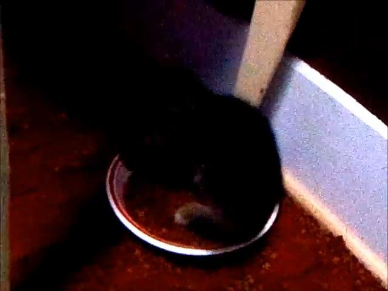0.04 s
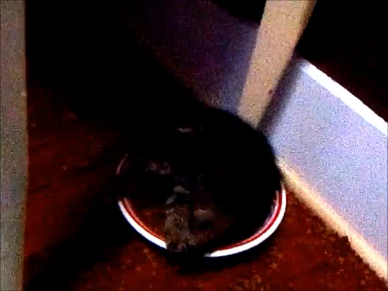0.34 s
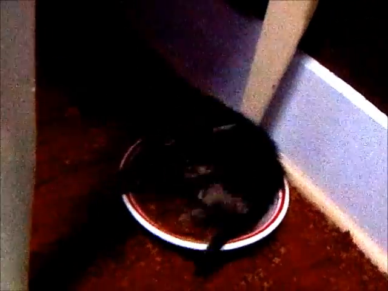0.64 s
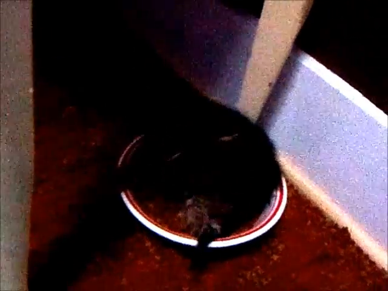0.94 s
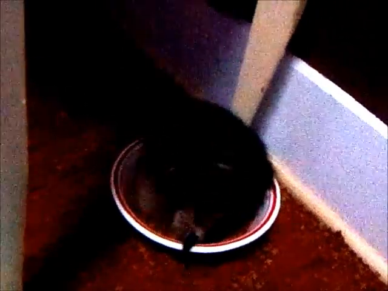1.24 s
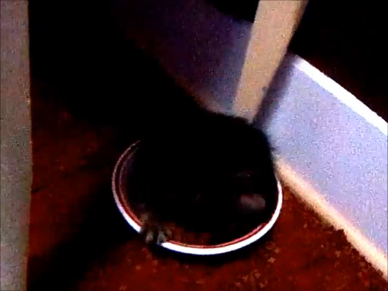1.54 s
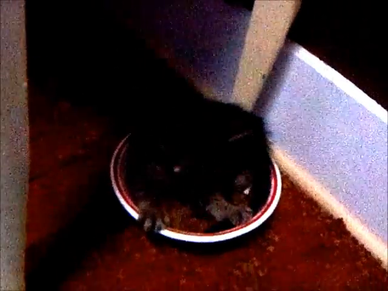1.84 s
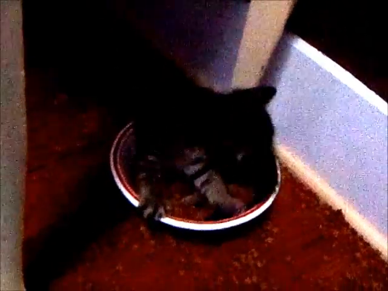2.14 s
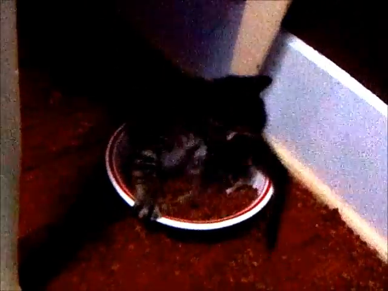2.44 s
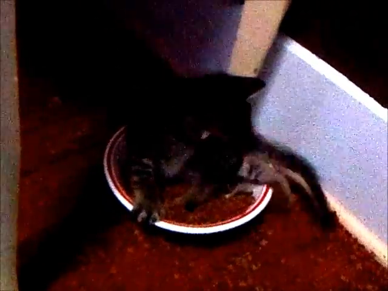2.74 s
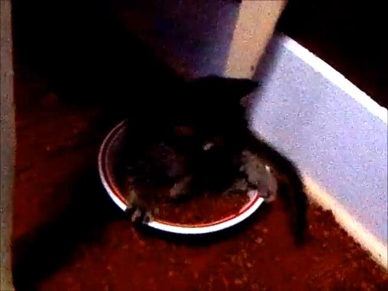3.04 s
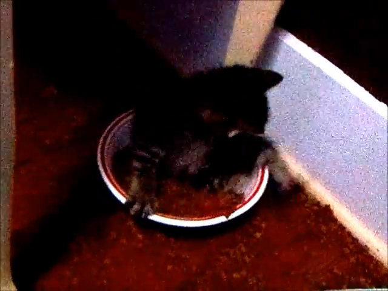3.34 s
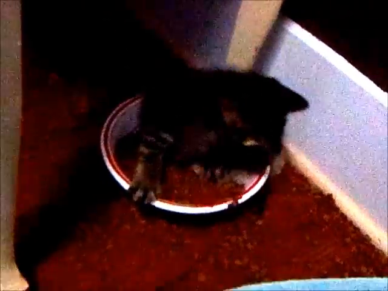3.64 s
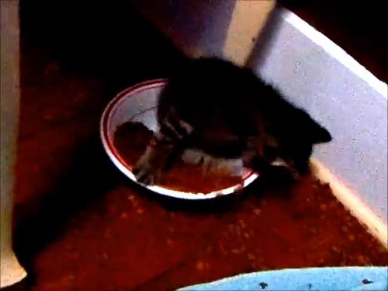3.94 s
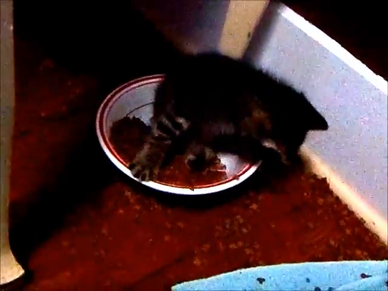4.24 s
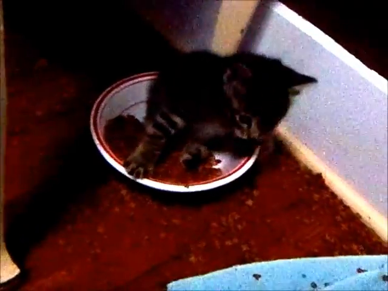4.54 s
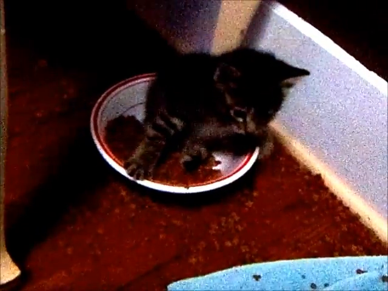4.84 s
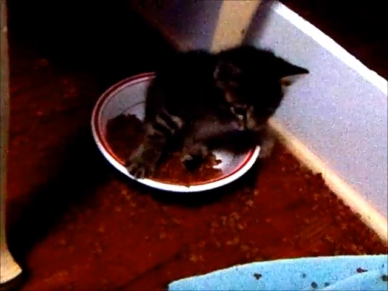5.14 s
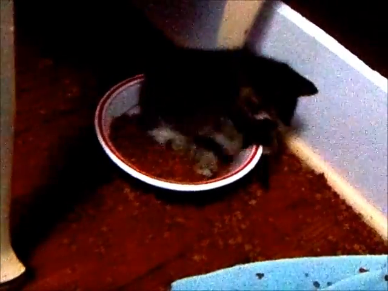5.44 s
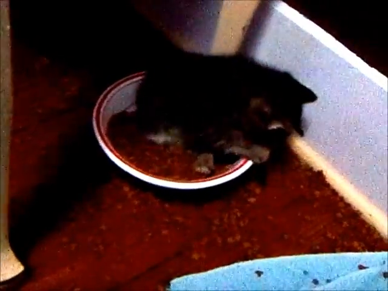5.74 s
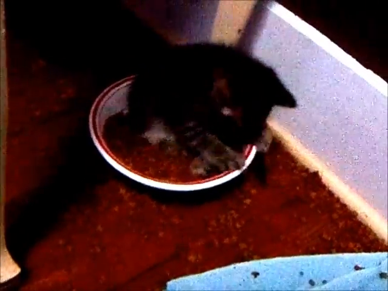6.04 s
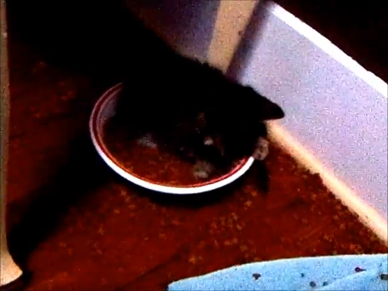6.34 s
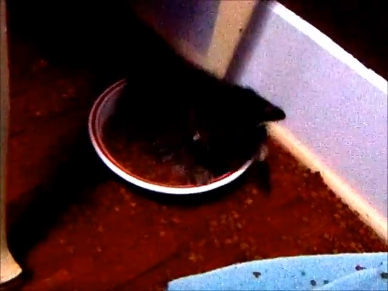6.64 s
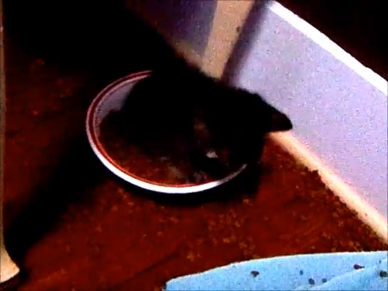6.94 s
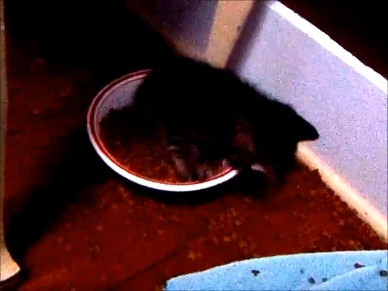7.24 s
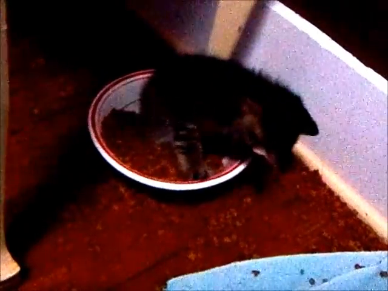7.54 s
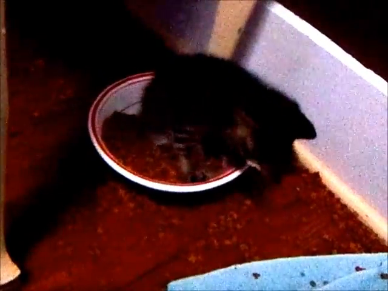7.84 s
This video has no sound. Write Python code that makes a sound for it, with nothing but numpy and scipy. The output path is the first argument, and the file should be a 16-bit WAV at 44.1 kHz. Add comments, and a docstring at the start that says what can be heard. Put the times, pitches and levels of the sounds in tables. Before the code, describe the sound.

A kitten digs through dry kibble in a ceramic plate, the pellets scraping and clinking in uneven bursts. Now and then the plate tips and knocks on the wooden floor. Midway, cloth rubs and crackles close to the microphone with several sharp clicks. The plate then lands with a ringing clatter and the digging thins out. The room is small, with a low rumble, faint hiss and a thin whine.

```python
"""Dry kibble clinks and scrapes in a ceramic plate as a kitten digs through it: the pellets set the well,
bottom and rim ringing, and now and then the plate tips and knocks back down on the wooden floor.
Close to the microphone, cloth rubs and crackles, loudest midway, where sharp clicks join in. The place
is a small room, heard on one microphone, with a low rumble and the recorder's faint hiss and whine."""
import sys
import numpy as np
from scipy import signal
from scipy.fft import rfft, irfft, next_fast_len
from scipy.io import wavfile
from scipy.ndimage import uniform_filter1d, map_coordinates

SR = 44100
rng = np.random.default_rng(int(sys.argv[2]) if len(sys.argv) > 2 else 0)


def put_to_file(sound):
    """Save the sound as 16-bit audio at rate SR, in the file named by the first command-line argument."""
    columns = np.atleast_2d(sound).T  # one column per channel
    safe = np.clip(columns, -1, 1)
    whole_steps = np.round(safe * 32767)
    wavfile.write(sys.argv[1], SR, whole_steps.astype(np.int16))


N = 357205
TIME = np.arange(N) / SR
HIT = np.arange(SR // 2) / SR  # time within one impact, s

# paw strokes in the plate: peak t/s, scrape level/dB, rim level/dB, ping level/dB, rise/s, fall/s
PAW_STROKES = [(.14, -51.5, -72, -54, 0.07, 0.045), (.205, -39.5, -70, -42.5, 0.015, 0.034),
               (.345, -55, -63, -61, .01, 0.14), (.56, -61, -66, -77, 0.11, .07),
               (.884, -49.5, -61, -76, .005, 0.024), (1.128, -46.5, -73, -70, 0.0086, 0.034),
               (1.41, -45, -56, -54, 0.1, .07), (1.625, -59, -65, -70, .01, 0.032),
               (2.08, -53, -52, -70, .07, 0.048), (2.3, -45.5, -56, -57, 0.047, 0.057),
               (2.55, -53.5, -62, -75, 0.015, .025), (2.635, -50.5, -75, -79, .015, .02),
               (3.11, -62, -73, -66, 0.035, 0.078), (3.25, -52.5, -69, -60, 0.18, 0.099),
               (4.15, -40, -47, -50, 0.03, 0.13), (5.26, -41, -46, -70, 0.0067, .025),
               (5.29, -44, -43.5, -64, .012, 0.031), (5.362, -55, -49, -66, 0.011, 0.018),
               (5.47, -55, -56, -64, 0.062, .06), (6.2, -50, -61, -56.5, 0.03, .013),
               (6.7, -59, -70, -61, 0.024, 0.044)]
# modes of the plate's well, damped by the food: f/Hz, level/dB, t60/s
WELL_MODES = [(5730, 0.5, 0.018), (7350, -8, 0.12), (8500, 13.5, 0.01), (9120, 2, 0.058),
              (11000, 10.5, 0.017), (11400, 2.5, 0.037), (13300, 7.5, 0.015)]
# bending modes of the plate's rim: f/Hz, level/dB, t60/s
RIM_MODES = [(612, -11, .2), (762, 3, .25), (795, 5, .12), (1030, -2, .09), (1069, 2, .22), (1121, 0, .26),
             (1366, -6, .2), (1502, -12, .22), (1680, -8, .2), (1733, -1.5, .22), (1888, -8, .2),
             (2042, -5, .2), (2961, 4, .22), (4605, 3, .11), (6480, 0, .075), (7100, -4, .06),
             (7430, -3, .05), (8400, 1, .05), (8560, 3, .08), (9980, 1, .05), (11200, 2, .04),
             (12100, 3, .05)]
# short ping of the plate's bottom: f/Hz, level/dB, t60/s
BOTTOM_MODES = [(3330, -3.5, 0.019), (3682, 1, 0.012), (3704, -8.5, 0.018)]
# spectrum of a pellet's contact with the glaze: f/Hz, level/dB
PELLET_SPECTRUM = [(300, -26), (1500, 2.5), (3000, 5), (6000, 6.5), (10000, 5.5), (14000, 4.5)]
# a light, glancing pellet hardly moves the rim's low modes: f/Hz, level/dB
GLANCE_SPECTRUM = [(600, -8), (1200, -22), (1750, 2), (2300, -10), (3000, 3), (4600, 5), (6500, 13.5),
                   (9000, 2.5), (12000, 3), (14000, -1)]
def digging(spots=3):
    """Pellets jostle under the paw and after each knock; each spot on the glaze rings in its own way."""
    scrape, on_rim, on_bottom = gestures(PAW_STROKES)
    jolts = sum(amp(rim_db) * swell(s + 0.02, rise=0.012, fall=0.011)
                for s, _, _, rim_db, _ in PLATE_KNOCKS)
    scrape = np.hypot(scrape, amp(-11.5) * jolts)
    clumps = amp(2 * wobble(rate=60))
    well, rim, ping = np.zeros((3, N))
    for _ in range(spots):
        contacts = unit(grains(rate=350, spread_db=4) * clumps) / np.sqrt(spots)
        scratches = scrape * contacts
        well += through(scratches, ring(WELL_MODES, scatter_db=2)) + scratches
        rim += through(on_rim * contacts, ring(RIM_MODES, scatter_db=3))
        ping += through(on_bottom * contacts, ring(BOTTOM_MODES, scatter_db=3))
    plate = amp(-3) * colour(well, PELLET_SPECTRUM) + colour(rim, GLANCE_SPECTRUM) + ping
    return room(plate, wet_db=-9.5)


# single pellets hitting the plate: t/s, tick level/dB, rim level/dB, ping level/dB
PELLET_CLINKS = [(0.0728, -37.5, -68, -47.5), (.1386, -43.5, -62, -49), (0.2218, -35, -49.5, -55),
                 (0.2623, -38.5, -55, -54), (0.34, -45, -51, -63), (1.1243, -44, -57, -72),
                 (1.2882, -55, -50.5, -66), (1.322, -48, -63, -66), (1.4416, -38, -55, -64),
                 (1.621, -43.5, -54, -63), (2.6494, -49, -69, -69), (2.946, -46, -66, -49),
                 (3.1804, -57, -55, -47), (3.237, -49, -56, -56), (3.291, -46, -58, -64),
                 (3.6116, -41.5, -56, -55), (5.256, -39, -53, -51), (5.281, -40, -52, -62),
                 (5.3052, -46, -45.5, -51), (5.362, -41, -49, -63), (5.513, -47, -53, -58),
                 (5.584, -44.5, -64, -60), (6.0832, -41.5, -55.5, -52), (6.4808, -39.5, -57, -43.5),
                 (6.6266, -33.5, -66, -37), (6.6884, -44, -56, -48), (6.7354, -41.5, -60, -48),
                 (6.8322, -45.5, -62, -58), (6.9492, -43.5, -60, -62), (7.882, -49, -67, -64)]
def clinks(skid_s=0.0033):
    """A pellet strikes and skids briefly, ringing the well, the rim and the bottom."""
    out = np.zeros(N)
    for s, tick_db, rim_db, ping_db in PELLET_CLINKS:
        contact = burst(skid_s) * rng.random(len(HIT)) ** 3
        well = through(contact, ring(WELL_MODES, scatter_db=2.5))
        tick = colour(well + amp(3) * contact, PELLET_SPECTRUM)
        rim = colour(ring(RIM_MODES, scatter_db=3), GLANCE_SPECTRUM) * attack(skid_s)
        ping = ring(BOTTOM_MODES, scatter_db=2) * attack(0.0006)
        for db, part in (tick_db, tick), (rim_db, rim), (ping_db, ping):
            add(out, s, amp(db) * unit_peak(part))
    return room(out, wet_db=-8.5)


# the plate is pressed down or drops back: t/s, thud level/dB, scuff level/dB, rim level/dB, chatter/s
PLATE_KNOCKS = [(.259, -50, -46.5, -50, 0.0089), (0.401, -39.5, -53, -58, 0.032),
                (.718, -38, -36, -33, .01), (1.385, -29.5, -34, -73, .008), (2.177, -35.5, -34, -35, 0.016),
                (2.946, -30.5, -33.5, -69, 0.0054), (3.225, -47.5, -50.5, -79, 0.0085),
                (3.489, -40, -48, -68, 0.0087), (5.338, -33, -29.5, -23, 0.023),
                (6.496, -34, -47, -74, 0.021), (7.615, -44.5, -39.5, -36, 0.0049)]
# modes of the floorboards under the plate: f/Hz, level/dB, t60/s
BOARD_MODES = [(173.3, -1, 0.41), (222, -0.5, 0.19), (290.2, 2, 0.29), (335.6, 2, 0.093), (380, -37, 0.37),
               (479, -13, 0.33), (526, -8, 0.037)]
# spectrum of the plate's foot scuffing the wood: f/Hz, level/dB
SCUFF_SPECTRUM = [(100, 2.5), (300, 15), (600, 11), (1050, 10), (2000, 10.5), (3000, 0), (8000, 14.5),
                  (14000, -1)]
def knocks():
    """The plate's foot thuds on the boards and chatters; harder landings ring higher rim modes."""
    out = np.zeros(N)
    for s, thud_db, scuff_db, rim_db, chatter in PLATE_KNOCKS:
        tilt_db = 4 + 0.56 * (scuff_db - thud_db)  # more scuff, brighter thud
        # when the rim lands first, the weight reaches the boards a little later
        rise = 0.0018 + 0.046 / (1 + amp(thud_db - rim_db))
        punch = 1 + 1.96 * np.exp(-HIT / 0.0044)
        thud = ring(BOARD_MODES, scatter_db=0, tilt_db=tilt_db) * attack(rise) * punch
        rim = soften(ring(RIM_MODES, scatter_db=2.5), rim_db, usual_hz=1510, order=3)
        rim *= 1 + 7 * np.exp(-HIT / chatter)  # loudest until the foot has settled
        scuff = soften(colour(burst(chatter), SCUFF_SPECTRUM), scuff_db, usual_hz=1600, order=2)
        add(out, s, amp(thud_db) * unit_peak(thud))
        add(out, s, amp(scuff_db) * unit_peak(room(scuff, wet_db=-5)))
        add(out, s, amp(rim_db) * unit_peak(room(rim, wet_db=-12)))
    return out


# pellets knocking together, each pair at its own pitch: t/s, level/dB, f/Hz
PELLET_PAIRS = [(1.202, -44.5, 2580), (1.565, -50, 5500), (2.088, -46.5, 3030), (2.769, -53, 2950),
                (3.068, -52, 3350), (5.236, -51, 3300)]
def pellet_ticks(t60_s=0.016):
    """A dry pellet struck by another rings with one brief, rough mode."""
    out = np.zeros(N)
    for s, db, hz in PELLET_PAIRS:
        tick = through(burst(0.001), ring([(hz, 0, t60_s)], scatter_db=0))
        add(out, s, amp(db) * unit_peak(tick))
    return room(out, wet_db=-9)


# cloth swishing close to the microphone: peak t/s, rub level/dB, crackle level/dB, rise/s, fall/s
CLOTH_SWISHES = [(1.78, -54, -74, .04, 0.084), (3.427, -43, -44.5, 0.0022, 0.09),
                 (3.8, -45.5, -47.5, 0.085, 0.2), (3.98, -32, -50, 0.0083, 0.022),
                 (4.075, -39.5, -40, 0.047, 0.12), (4.26, -48, -47.5, 0.12, 0.23),
                 (4.458, -43.5, -41.5, 0.0025, 0.055), (6.4, -61, -76, .07, .05),
                 (7.25, -58, -73, 0.054, 0.14), (7.95, -59, -76, .17, 0.23)]
# dull flaps of the cloth: t/s, flap level/dB, bump level/dB, decay/s
CLOTH_FLAPS = [(3.33, -47, -53, 0.0095), (3.429, -43, -80, 0.0026), (3.523, -41.5, -51, 0.0019),
               (3.941, -34.5, -58, 0.0074), (3.977, -33.5, -36, 0.0024), (4.026, -31, -50, 0.0078),
               (4.167, -34, -41, 0.006), (4.258, -33, -63, 0.0042), (4.291, -38, -41.5, .005),
               (4.33, -43, -66, .004), (4.456, -34, -65, 0.014)]
# spectra of the cloth's rub, crackle and flaps: f/Hz, level/dB
RUB_SPECTRUM = [(40, -17), (90, -23), (140, -20), (300, -8), (600, 3), (1050, 4.5), (1600, 5), (3000, 4),
                (5000, -4), (14000, -10)]
CRACKLE_SPECTRUM = [(500, -113), (2500, -6), (4000, -2), (6000, -1), (8400, -2.5), (9500, -3.5),
                    (12000, -5), (14000, -6.5)]
FLAP_SPECTRUM = [(100, -10), (500, -10.5), (800, -1.5), (1150, -2), (1600, -10), (2500, -8.5), (5000, -22),
                 (14000, -27)]
def cloth():
    """Fabric slides by the microphone, rubbing and crackling; the room answers only its flaps."""
    rubbing, crackling = gestures(CLOTH_SWISHES)
    rub = rubbing * unit(colour(grains(rate=3500, spread_db=3), RUB_SPECTRUM))
    crackle = crackling * unit(colour(grains(rate=1700, spread_db=5), CRACKLE_SPECTRUM))
    flaps = np.zeros(N)
    for s, flap_db, bump_db, decay in CLOTH_FLAPS:
        flap = colour(burst(decay), FLAP_SPECTRUM)
        bump = colour(burst(0.022), [(60, -27), (135, 0), (280, -7), (700, -22.5)])
        add(flaps, s, amp(flap_db) * unit_peak(flap) + amp(bump_db) * unit_peak(bump))
    return rub + crackle + room(flaps, wet_db=-3.5)


# sharp, bright clicks close to the microphone: t/s, level/dB, centre f/Hz, decay/s
CLOSE_CLICKS = [(3.426, -32.5, 3650, 0.0044), (3.7816, -35, 4000, 0.0013), (3.7874, -32, 3600, 0.0014),
                (3.8196, -34, 4000, 0.0028), (3.881, -35, 5500, 0.0028), (3.8912, -27, 5000, 0.0016),
                (3.9118, -27.5, 4500, 0.0019), (3.947, -29, 9000, 0.0019), (3.9701, -13.5, 10200, 0.00054),
                (4.0445, -27, 5840, 0.0026), (4.073, -21.5, 7440, 0.0032), (4.0787, -25, 5950, 0.0031),
                (4.4068, -39, 5030, 0.0024), (4.457, -36, 3200, 0.0015), (7.2963, -50.5, 4000, 0.014),
                (7.4552, -52, 3800, 0.021)]
# spectrum of the clicks, with two treble resonances: f/Hz, level/dB
CLICK_SPECTRUM = [(3000, 4.5), (6000, -2.5), (7300, 1), (8200, 4.5), (9800, -5), (11200, 3.5), (12500, -6),
                  (14000, -1.5)]
def close_clicks():
    """Brief, bright bursts of noise, each around its own centre frequency."""
    out = np.zeros(N)
    for s, db, hz, decay in CLOSE_CLICKS:
        click = colour(burst(decay), [(hz / 8, -20), (hz / 2, -12), (hz, 0), (hz * 4, -8)])
        add(out, s, amp(db) * unit_peak(colour(click, CLICK_SPECTRUM)))
    return room(out, wet_db=-8.5)


# decay of the small room around the microphone: f/Hz, t60/s
ROOM_DECAY = [(150, 1), (800, 0.51), (2200, 0.63), (6000, 0.47), (13000, 0.21)]
def room(x, wet_db):
    """The direct sound plus the room's diffuse tail, whose treble dies first."""
    hz, t, noise = signal.stft(rng.standard_normal(len(HIT)), SR, nperseg=256)
    decay = amp(-60 * t / along(ROOM_DECAY, hz)[:, None])
    _, tail = signal.istft(noise * decay, SR, nperseg=256)
    tail = np.pad(tail, (200, 0)) / np.linalg.norm(tail)  # 4.5 ms behind the direct sound
    return x + amp(wet_db) * through(x, tail)


# noise floor, from the room's rumble up to the recorder's hiss: f/Hz, level/dB
NOISE_FLOOR = [(12, 0), (22, 0.5), (100, -1), (455, -8.5), (855, -10.5), (2170, -15.5), (5670, -18),
               (8500, -18), (12900, -22), (14000, -21)]
def background(whine_hz=7882, whine_db=-63, warble_hz=30):
    """Room rumble, recorder hiss and an electronic whine that steps up and down and sometimes sags."""
    hiss = amp(-54.5) * unit(colour(rng.standard_normal(N), NOISE_FLOOR))
    cycle, within = np.divmod(warble_hz * TIME, 1)
    sags = rng.random(int(cycle[-1]) + 1) < 0.3
    pitch = whine_hz + np.where(within < 0.5, 17, -17 - 60 * sags[cycle.astype(int)])
    return hiss + amp(whine_db) * np.sin(2 * np.pi * np.cumsum(pitch) / SR)


def ring(modes, scatter_db, tilt_db=0):
    """Struck modes: damped sines of scattered strength, tilted by tilt_db per octave, total energy 1."""
    hz, db, t60 = np.transpose(modes)[:, :, None]
    strength = db + tilt_db * np.log2(hz) + scatter_db * rng.standard_normal(hz.shape)
    sign = (-1) ** np.arange(len(hz))[:, None]
    y = np.sum(sign * amp(strength - 60 * HIT / t60) * np.sin(2 * np.pi * hz * HIT), 0)
    return y / np.linalg.norm(y)


def soften(x, db, usual_hz, order, usual_db=-38.5, db_per_octave=17.5):
    """The low-pass of a contact, which opens as the blow gets harder."""
    cutoff = np.clip(usual_hz * 2 ** ((db - usual_db) / db_per_octave), 900, SR / 3)
    return signal.lfilter(*signal.butter(order, cutoff, fs=SR), x)


def burst(decay_s):
    """Noise that dies with the given time constant."""
    return rng.standard_normal(len(HIT)) * np.exp(-HIT / max(decay_s, 1e-4))


def attack(rise_s):
    """An onset that climbs towards 1 with the given time constant."""
    return 1 - np.exp(-HIT / rise_s)


def grains(rate, spread_db):
    """Random tiny impacts of uneven size, about rate a second, rms 1."""
    size = amp(spread_db * np.clip(rng.standard_normal(N), -2, 2))
    sign = np.sign(rng.standard_normal(N))
    return unit(size * sign * (rng.random(N) < rate / SR))


def swell(s, rise, fall):
    """An envelope that grows to 1 at time s and dies away, with these time constants."""
    distance = np.maximum((s - TIME) / max(rise, 1e-4), (TIME - s) / max(fall, 1e-4))
    return np.exp(-distance.clip(0, 20))


def gestures(rows):
    """One envelope per level column of a table of swells; overlapping swells add in power."""
    power = sum(np.outer(amp(levels), swell(s, rise, fall)) ** 2 for s, *levels, rise, fall in rows)
    return np.sqrt(power)


def wobble(rate):
    """A smooth random curve, rate knots a second."""
    return map_coordinates(rng.standard_normal(int(N * rate / SR) + 4), [TIME * rate])


def colour(x, spectrum, size=4096):
    """x through a minimum-phase filter shaped like the given spectrum."""
    gain = amp(along(spectrum, np.fft.rfftfreq(size, 1 / SR)))
    cepstrum = irfft(np.log(gain))
    cepstrum[1:size // 2] *= 2
    cepstrum[size // 2 + 1:] = 0
    response = irfft(np.exp(rfft(cepstrum)))
    return through(x, response / np.linalg.norm(response))


def through(x, response):
    """x convolved with an impulse response, at its own length."""
    return signal.fftconvolve(x, response)[:len(x)]


def along(points, hz):
    """Interpolate (f/Hz, value) points on a log frequency axis."""
    f, values = np.transpose(points)
    return np.interp(np.log(hz + 1), np.log(f + 1), values)


def amp(db):
    """Decibels to gain."""
    return 10 ** (np.asarray(db) / 20)


def unit(x):
    """Scale to rms 1."""
    return x / np.sqrt(np.mean(x ** 2) + 1e-20)


def unit_peak(x):
    """Scale so that the loudest 3 ms have rms 1."""
    return x / np.sqrt(uniform_filter1d(x ** 2, 130).max() + 1e-20)


def add(track, s, sound):
    """Mix a sound in at time s."""
    part = track[max(round(s * SR), 0):][:len(sound)]
    part += sound[:len(part)]


def scene():
    """Everything at one microphone."""
    return (knocks() + clinks() + digging() + cloth() + close_clicks() + background() + pellet_ticks())[None]


TOP_HZ = 14100
def record(dry):
    """The recorder keeps nothing above its band limit."""
    size = next_fast_len(N + SR // 2)
    passband = np.fft.rfftfreq(size, 1 / SR) < TOP_HZ
    return irfft(rfft(dry, size) * passband, size)[:, :N]


dry = scene()
out = record(dry)
put_to_file(out)
```